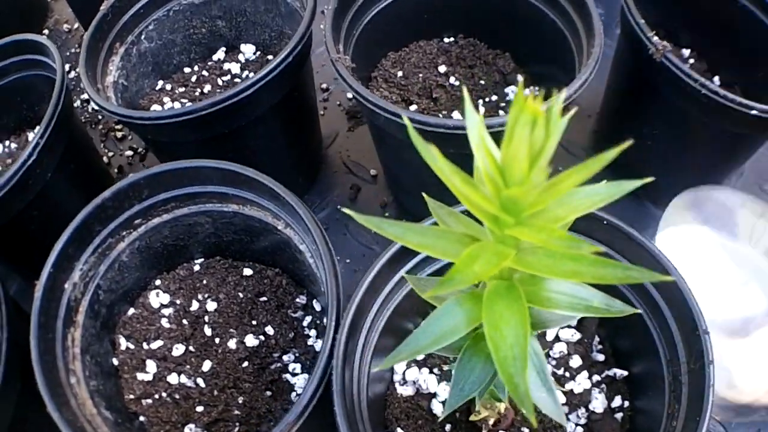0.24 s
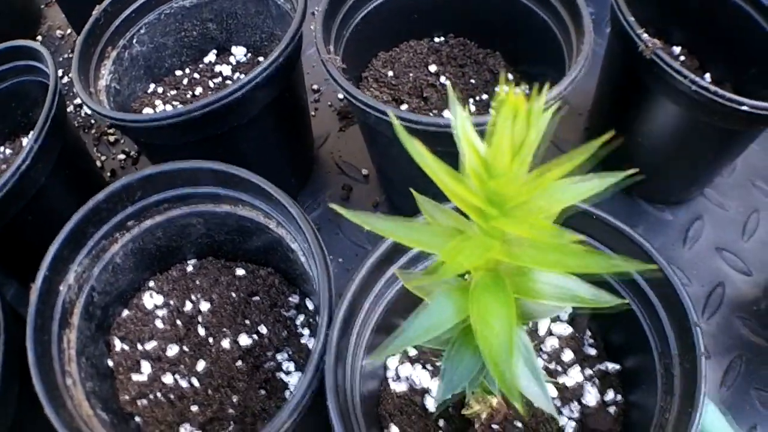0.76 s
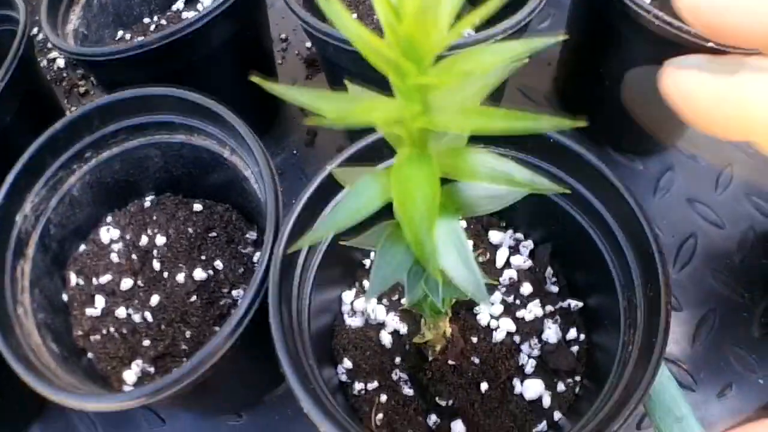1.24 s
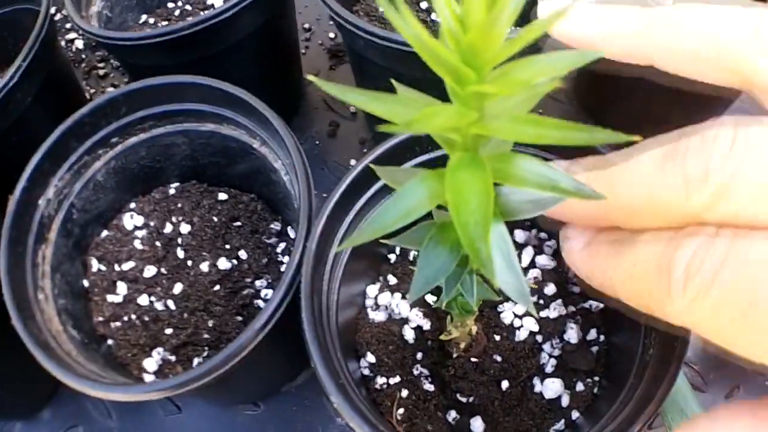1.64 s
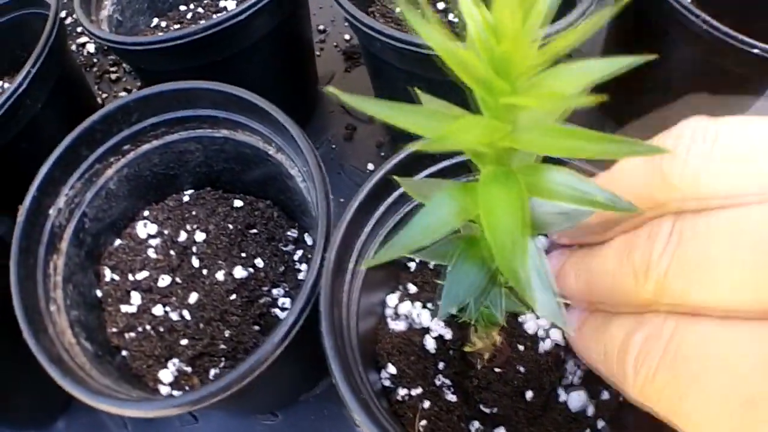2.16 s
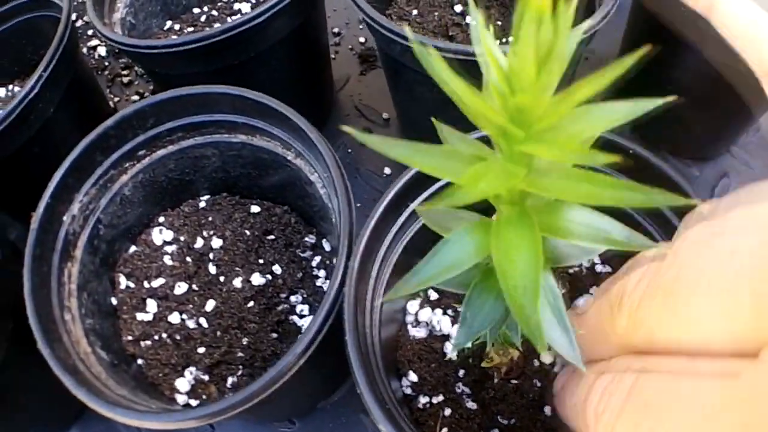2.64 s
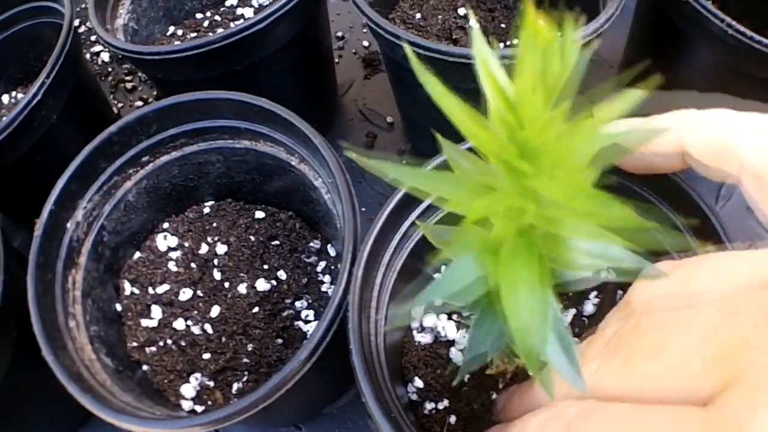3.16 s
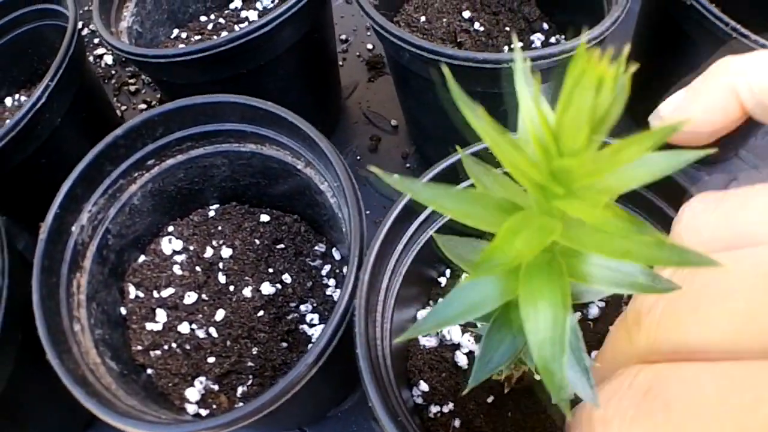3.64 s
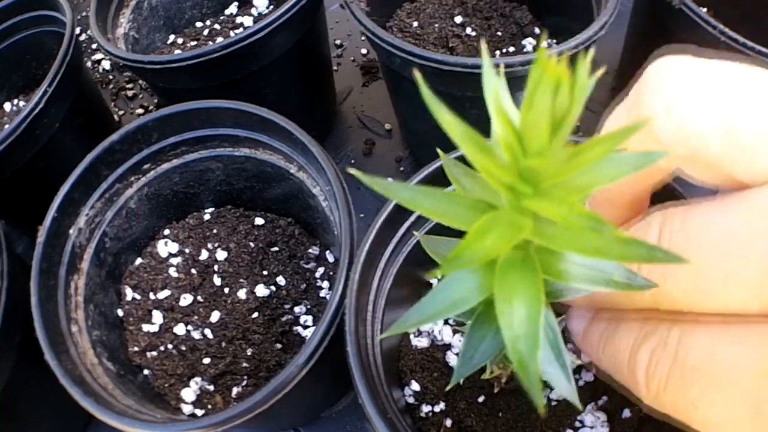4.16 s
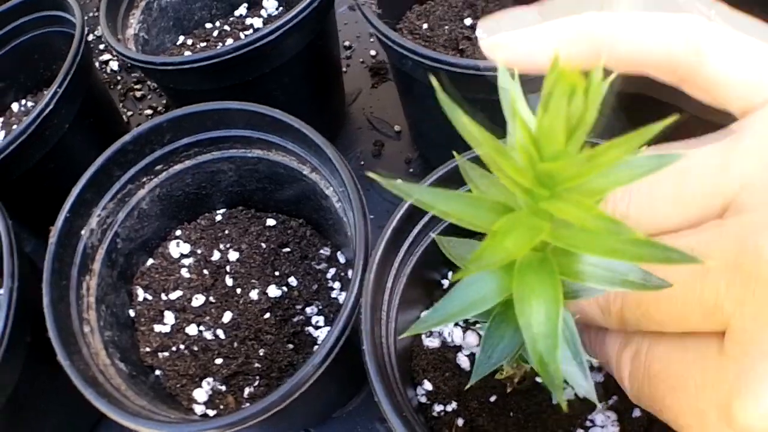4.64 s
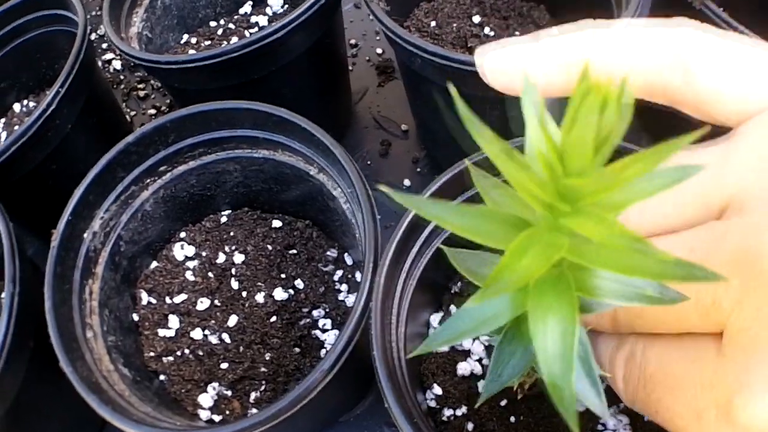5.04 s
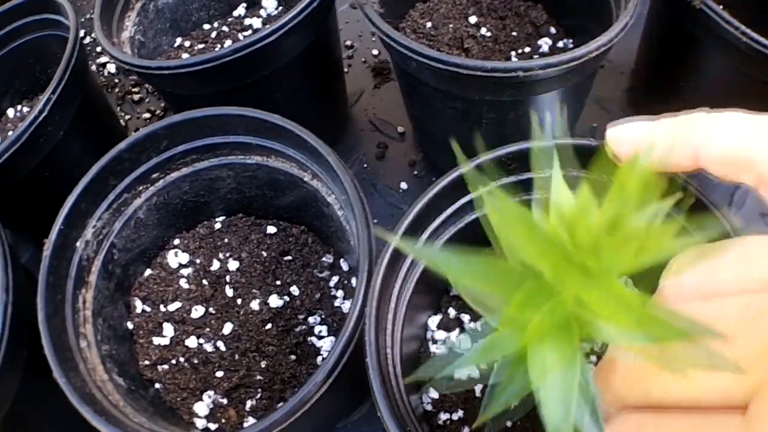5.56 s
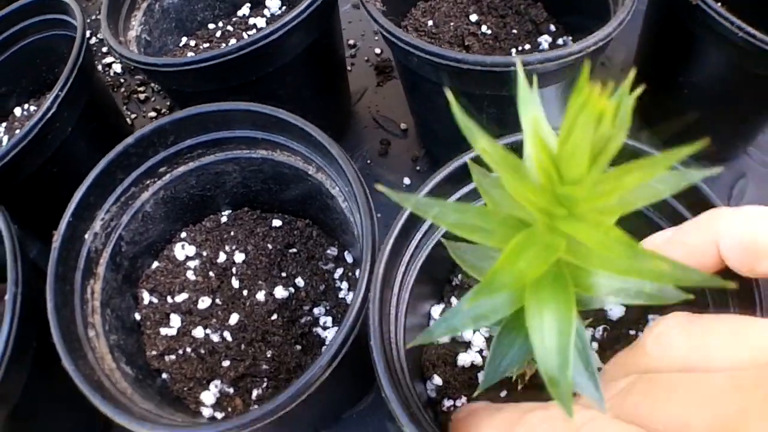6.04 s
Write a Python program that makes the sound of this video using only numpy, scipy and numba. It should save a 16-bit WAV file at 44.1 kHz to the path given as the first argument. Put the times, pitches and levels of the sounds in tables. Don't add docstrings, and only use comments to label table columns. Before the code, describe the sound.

Close up outdoors, a scoop raps a thin plastic pot hard, coarse grit rattles inside it, and a second sharp knock follows with a brief spill of fine soil. Wind thumps the small camera microphone around the knocks. After a short quiet gap, fingers press and drag the gritty compost in small, dry, scratchy strokes with tiny clicks, over faint outdoor wash and hiss.

```python
import sys
import numpy as np
from scipy import signal
from scipy.fft import rfft, irfft, next_fast_len
from scipy.io import wavfile
from scipy.ndimage import uniform_filter1d
from numba import njit

SR = 44100
rng = np.random.default_rng(int(sys.argv[2]) if len(sys.argv) > 2 else 0)


def dump(signal):
    limited = np.clip(np.atleast_2d(signal).T, -1, 1)
    pcm = np.round(limited * 32767).astype(np.int16)
    wavfile.write(sys.argv[1], SR, pcm)


def to_linear_factor(level_db):
    exponent = np.asarray(level_db, float) / 20
    return 10 ** exponent


N = 277996
TIME = np.arange(N) / SR
FULL_PRESSURE_DB = -37


@njit
def ring(at, hz, t60, size, push):
    out = np.zeros(N)
    for k in range(len(at)):
        turn = np.exp(2j * np.pi * hz[k] / SR - np.log(1000) / (t60[k] * SR))
        ease, left, z = np.exp(-hz[k] / (push * SR)), 1., size[k] + 0j
        for i in range(at[k], min(N, at[k] + int(t60[k] * SR))):
            out[i] += z.imag * (1 - left)
            z *= turn
            left *= ease
    return out


def samples(s):
    return (s * SR).astype(np.int64)


def unit(x):
    return x / np.sqrt(np.mean(x ** 2))


def shaped(points):
    hz, db = np.transpose(points)
    n = next_fast_len(N)
    f = np.maximum(np.fft.rfftfreq(n, 1 / SR), 1)
    colour = to_linear_factor(np.interp(np.log(f), np.log(hz), db, -90, -90))
    return unit(irfft(rfft(rng.standard_normal(n)) * colour, n)[:N])


def walk(rate):
    k = int(SR / rate)
    held = np.repeat(rng.standard_normal(N // k + 1), k)
    return 0.81 * uniform_filter1d(held, k)[:N]


def drawn(points):
    return np.interp(TIME, *np.transpose(points))


def above(x, hz):
    return signal.sosfilt(signal.butter(8, hz, "high", fs=SR, output="sos"), x)


def hollow(x, bands):
    for hz, width, depth in bands:
        x = x - np.clip(depth, 0, 1) * signal.lfilter(*signal.iirpeak(hz, hz / width, fs=SR), x)
    return x


def strokes(*kinds):
    t = np.arange(0, N / SR + .002, .001)
    power, columns = [], []
    for rows, rise_s, tilt_db, fall_s in kinds:
        s, length, db, *rest = np.transpose(rows)[:, :, None]
        done = np.clip((t - s) / length, 0, 1)
        edges = np.maximum(s - t, 0) / rise_s + np.maximum(t - s - length, 0) / fall_s
        level_db = db + tilt_db * done - max(tilt_db, 0) - 20 * edges
        power.append(to_linear_factor(np.maximum(level_db, -200)) ** 2)
        columns.append(rest)
    power = np.concatenate(power)
    total = power.sum(0)
    blended = (np.concatenate(columns, axis=1) * power).sum(1) / total
    return [np.interp(TIME, t, c) for c in (10 * np.log10(total), *blended)]


# frequency [Hz], level [dB per Hz].
AIR_COLOUR = [(15, -47), (25, -2), (45, -7.5), (85, -12), (204, -10.5), (284, -10), (465, -8), (859, -9.5),
              (2150, -14.5), (2600, -13.5), (7000, -22.5), (9100, -50), (15400, -120)]
# pitch [Hz], level [dB].
DRONE = (62.4, -61)


def air():
    hz, db = DRONE
    drone = to_linear_factor(db) * shaped([(hz * 0.71, -18), (hz, 0), (hz * 1.25, -18)])
    wash = shaped(AIR_COLOUR + [(9000, -30)])
    return to_linear_factor(-47.5 + 0.16 * walk(2.63)) * wash + drone


# start [s], length [s], rumble [dB], flutter over rumble [dB].
GUSTS = [(0.001, 0.004, -27, -26), (.02, 0.12, -36.5, -8), (.17, 0.15, -37.5, -21), (.27, 0.051, -32, -19),
         (.34, 0.19, -41, -13), (.51, 0.054, -31.5, -6), (.555, 0.093, -28, 8.5), (.66, 0.11, -35, 4),
         (.86, 0.14, -43.5, -7.5), (.985, 0.044, -37, 10), (1.04, 0.068, -46.5, -8),
         (1.22, 0.037, -44.5, -18), (1.3, 0.19, -55, -10), (1.665, 0.028, -38.5, -29),
         (1.72, 0.15, -48, -20), (1.85, 0.078, -43.5, -18), (1.955, 0.081, -35.5, -3.5),
         (2.1, 0.12, -54, -18), (2.44, 0.14, -58, -19), (2.78, 0.14, -51, -23), (3.0, .1, -63, -10)]
# [Hz, negative sucks first].
PUFFS = [(.206, -25, 195), (0.266, -27, 94), (0.289, -14.5, 111), (.306, -16, 360), (0.346, -29, 216),
         (0.421, -26.5, 229), (0.541, -17, 300), (0.5597, -5, 131), (0.5798, -7, 172), (.591, -10, -150),
         (0.617, -21, 152), (0.62, -10, 398), (1.002, -23, 172), (1.665, -31, 49), (1.73, -43, 71),
         (1.798, -34, 73), (1.943, -25, 102), (1.9585, -18.5, 186), (1.968, -23, -27), (1.977, -32, 129),
         (1.987, -30, 132), (2.007, -29, 130), (2.043, -30.5, 134)]
# time [s], level [dB].
SWAY = [(0, -44), (.25, -45), (.45, -49), (.6, -41), (.85, -56), (1.0, -74), (1.4, -69), (1.65, -50),
        (1.85, -47.5), (1.98, -44), (2.15, -44), (2.3, -58), (2.55, -54.5), (2.85, -51), (3.0, -65),
        (3.3, -76)]


def wind():
    db, flutter_db = strokes((GUSTS, 0.03, -5, 0.083))
    deep = shaped([(12, -5), (30, -6.0), (55, -3.0), (90, -19)]) * to_linear_factor(4.2 * walk(24.8))
    rumble = shaped([(40, -7), (90, -0.5), (150, -4.5), (300, -17.5)]) * to_linear_factor(3.8 * walk(30.5))
    flutter = shaped([(100, 4.5), (170, -6.5), (400, 0.5), (700, -14), (1200, -14)]) * to_linear_factor(7.2 * walk(90))
    buffet = to_linear_factor(db - 7.5) * deep + to_linear_factor(1.265 * db + 4.5) * rumble + to_linear_factor(db + flutter_db - 11.5) * flutter

    s, puff_db, hz = np.transpose(PUFFS)
    puffs = ring(samples(s), np.abs(hz), 6 / np.abs(hz), np.sign(hz) * to_linear_factor(puff_db + 2.5), 0.91)
    sway = shaped([(7, -9), (14, 5), (26, -3.5), (40, -39)]) * to_linear_factor(drawn(SWAY))
    earlier_gust = -to_linear_factor(-27.0) * np.exp(-(TIME / 0.005) ** 2)
    return buffet + puffs + earlier_gust + sway


def grit(curves, count, scatter_db, spread, cycles, edge_hz, dull_db, dull_hz,
         upper_db, upper_hz, bright_hz, bright_db, clump_db):
    db, hz, tick_db, thud_db = curves
    at = rng.integers(0, N, (4, count))
    size = to_linear_factor(scatter_db * np.minimum(rng.exponential(size=(4, count)), 4))
    pitch = np.exp(np.clip(rng.standard_normal((4, count)), -1.6, 1.6))
    narrowing = np.clip(2.0 - 0.1 * (db[at[0]] - FULL_PRESSURE_DB), .35, 1)
    f = np.clip([hz[at[0]] * pitch[0] ** (spread * narrowing),
                 upper_hz * pitch[1] ** .1,
                 bright_hz * pitch[2] ** .075,
                 dull_hz * pitch[3] ** .22], 300, 7800)
    wall, upper, tick, thud = (unit(ring(at[k], f[k], cycles * stretch / f[k], size[k], 0.35))
                               for k, stretch in enumerate((1, 1.6, 2.4, 1)))
    mix = unit(above(above(wall, edge_hz), edge_hz))
    mix = mix + to_linear_factor(upper_db) * upper + to_linear_factor(bright_db + tick_db) * tick + to_linear_factor(thud_db + dull_db) * thud
    return to_linear_factor(db + clump_db * walk(120)) * mix


def settle():
    since = TIME - .989
    db = np.where(since > 0, -28 - 188 * since, -200)
    hz = 2400 - 2500 * np.clip(since, 0, .15)
    return grit((db, hz, -21, -5), count=40000, scatter_db=2.0, spread=0.25, cycles=25, edge_hz=1380,
                dull_db=-3.0, dull_hz=830, upper_db=-11, upper_hz=3320, bright_hz=5040, bright_db=-14,
                clump_db=2.0)


# start [s], length [s], level [dB], ring [Hz], dull thud [dB].
SLIDES = [(.54, 0.056, -34, 2170, -4), (.606, 0.048, -37, 2500, -6), (.648, 0.063, -32.5, 2600, -14),
          (.7225, 0.012, -33.5, 2400, -8), (.745, 0.026, -39, 2400, -11), (.7735, 0.013, -31.5, 2940, -22),
          (.794, 0.032, -31.5, 2500, -18), (.835, 0.0069, -40, 2500, -20), (.86, 0.079, -53, 2500, -16),
          (.922, 0.023, -39.5, 2500, -5), (.943, 0.026, -34, 2530, -8)]


def rattle():
    db, hz, thud_db = strokes((SLIDES, .006, -4, 0.025))
    return grit((db, hz, -7.5, thud_db), count=6000, scatter_db=2.5, spread=0.27, cycles=10.0, edge_hz=1570,
                dull_db=-2.5, dull_hz=790, upper_db=-11.5, upper_hz=3700, bright_hz=4870, bright_db=-5.0,
                clump_db=4.0)


# start [s], length [s], peak [dB], ring [Hz], bright tick [dB].
PUSHES = [(1.512, 0.034, -43.5, 3170, 0.5), (1.585, 0.022, -42.5, 3000, 0.5), (1.97, 0.04, -47, 3000, 0.5),
          (2.09, 0.047, -51, 2750, -9), (2.19, 0.063, -48, 2980, -17), (2.4, 0.049, -39, 2980, -12),
          (2.57, 0.042, -44.5, 2660, -10), (2.747, 0.019, -34, 2840, -9), (2.895, 0.019, -46.5, 2770, -10),
          (3.005, 0.052, -41.5, 2820, -8), (3.435, 0.037, -38.5, 2440, -6), (3.79, 0.033, -47, 3530, -5),
          (4.04, 0.032, -41, 2800, -24), (4.485, 0.13, -39, 2800, -10), (4.63, 0.08, -35, 2900, -10),
          (4.802, 0.021, -37, 2660, -16), (4.875, 0.071, -37, 2750, -9), (5.012, 0.037, -36.5, 2740, -12),
          (5.092, 0.031, -35, 2770, -9.5), (5.34, 0.042, -50, 2700, -12), (5.74, 0.052, -41.5, 2760, -7),
          (5.89, 0.043, -46.5, 2600, -6), (6.085, 0.078, -42.5, 2860, -4), (6.15, 0.043, -40.5, 2870, -14)]
# start [s], length [s], peak [dB], ring [Hz], bright tick [dB].
DRAGS = [(1.43, 0.076, -50, 2930, 0), (2.26, 0.14, -51, 2900, -9), (2.45, 0.047, -43, 2750, -11),
         (2.625, 0.045, -49.5, 2800, -4), (2.775, 0.02, -45, 2870, -14), (2.84, 0.038, -49, 2740, -9),
         (3.25, 0.052, -44.5, 2950, -5), (3.396, 0.047, -47.5, 2420, -11), (3.515, 0.04, -45.5, 2270, -15),
         (3.85, 0.094, -52, 3150, -21), (4.005, 0.024, -45, 2800, -5.5), (4.116, 0.0083, -39.5, 2720, -13),
         (4.332, 0.097, -41.5, 3120, -9.5), (4.735, 0.0065, -41.5, 2930, 0),
         (4.835, 0.022, -42.5, 2630, -14), (5.188, 0.056, -38.5, 2800, -8.5),
         (5.557, 0.047, -40.5, 2800, -3.5), (5.805, 0.021, -43.5, 2920, -10), (5.935, 0.027, -46, 2600, -6),
         (6.015, 0.12, -48.5, 2940, -12), (6.225, 0.035, -41.5, 2900, -10), (6.275, .04, -43, 2920, -7)]
# time [s], level [dB].
UPPER_RING = [(1.4, -6), (2.0, -2.5), (2.5, -10.5), (3.3, -10), (3.55, -10), (3.8, -10), (4.1, -18),
              (4.35, -14), (4.52, -2), (4.62, -12), (4.73, -4.5), (5.1, -7.5), (5.57, -3.5), (5.7, -8.5),
              (6.3, -10)]


def fingers():
    db, hz, tick_db = strokes((PUSHES, 0.024, 8.5, 0.034), (DRAGS, 0.017, -1.5, 0.027))
    packing = np.clip((db - FULL_PRESSURE_DB) / 10, -1, 1) / 2
    hz = hz * (1 + 0.054 * packing)
    thud_db = -16 + 11 * np.exp(-((TIME - 4.07) / 0.11) ** 2)
    return grit((db, hz, tick_db, thud_db), count=24000, scatter_db=2.0, spread=0.16, cycles=13.0, edge_hz=1840,
                dull_db=1.5, dull_hz=1184, upper_db=drawn(UPPER_RING), upper_hz=4230, bright_hz=5960,
                bright_db=-2.0, clump_db=0.86)


# time [s], peak [dB], ring [Hz].
SCOOP_STONES = [(0.5489, -25, 1880), (0.5521, -28, 2600), (0.5563, -31, 1780), (0.5812, -29, 2090),
                (0.5955, -16, 2250), (0.6005, -22, 2390), (0.6084, -20, 2120), (0.612, -20, 2800),
                (0.6164, -19, 2850), (0.6214, -22, 2060), (0.628, -20, 2720), (0.63, -22, 1710),
                (0.6382, -15, 2990), (0.6395, -13.5, 2930), (0.644, -18.5, 1990), (0.6495, -27, 3110),
                (0.652, -24, 2950), (0.658, -29, 1680), (0.6609, -27, 2800), (0.6635, -22, 1940),
                (0.6677, -23, 2790), (0.674, -21.5, 1780), (0.68, -23, 2130), (0.6834, -26, 1900),
                (0.6898, -21, 3550), (0.6927, -26, 2440), (0.699, -21, 2780), (0.7212, -22, 2370),
                (0.7282, -22.5, 2600), (0.733, -23, 2330), (0.7478, -31, 3070), (0.759, -28, 2380),
                (0.772, -21, 2500), (0.7785, -20.5, 3800), (0.7927, -17.5, 3060), (0.797, -26, 3010),
                (0.8023, -20, 2060), (0.8066, -34, 3140), (0.8117, -21, 2490), (0.8205, -16, 2260),
                (0.8245, -27, 2600), (0.8354, -32, 2940), (0.8378, -30, 2040), (0.8418, -30, 3100),
                (0.8736, -37, 2780), (0.8923, -38, 2620), (0.914, -34, 3380), (0.9264, -32, 3050),
                (0.938, -34, 2750), (0.9439, -23, 2880), (0.9468, -23, 3050), (0.9516, -34, 3050),
                (0.9618, -29, 2500), (1.0209, -28, 1850), (1.0286, -31, 1850), (1.0401, -31, 2170),
                (1.0447, -31, 1860), (1.0495, -32, 1970), (1.0585, -30, 2250), (1.0787, -31, 1970),
                (1.1241, -35, 1940)]
# time [s], peak [dB], ring
# [Hz], bright tick [dB].
SOIL_STONES = [(1.428, -38, 3120, -12), (1.5299, -33, 3090, -5), (1.538, -35, 3370, -3),
               (1.5404, -35, 3010, 1), (1.5944, -36, 3000, -2), (2.3353, -32.5, 3660, -4),
               (2.4175, -33, 3010, -8), (2.42, -37, 2610, -13), (2.4317, -35, 2770, -11),
               (2.4367, -26, 3140, -20), (2.4466, -32, 4080, -9), (2.4513, -36, 2650, -11),
               (2.4629, -34, 3080, -8), (2.4758, -32, 2710, -15), (2.484, -35, 2370, -12),
               (2.747, -29.5, 3660, 5), (2.7503, -37, 2410, -3), (2.7572, -34, 2900, -10),
               (2.759, -28, 3070, 0), (2.764, -27, 3220, -7), (2.7702, -36, 3060, -12),
               (2.781, -30, 2700, 1.5), (2.7876, -36, 3060, -11), (2.9123, -35, 2670, -10),
               (2.9204, -34, 2750, -15), (3.032, -31, 3100, -11), (3.0441, -31, 2650, -13),
               (3.242, -34, 2960, -14), (3.2564, -29, 3200, -2), (3.2636, -33, 2010, -14),
               (3.2683, -37, 2240, -10), (3.28, -28, 3350, -17), (3.2861, -31, 3320, -17),
               (3.2911, -31, 2200, -17), (3.3936, -29.5, 2280, -14), (3.404, -29, 2510, -11),
               (3.416, -32, 2460, -19), (3.4409, -34, 2170, -12), (3.4772, -38, 2850, -12),
               (3.4849, -40, 2210, -17), (4.054, -36, 2790, -12), (4.117, -32.5, 2660, -16),
               (4.3338, -24.5, 3300, -11), (4.34, -32, 2920, -18), (4.371, -34, 3150, -17),
               (4.3789, -29, 3170, -5), (4.4014, -28.5, 2720, -6), (4.4096, -28, 2920, -14),
               (4.6993, -27, 2820, -5), (4.7104, -26, 2930, -7), (4.7137, -29, 3380, -5),
               (4.722, -29, 2850, -3), (4.7258, -29.5, 2560, 0), (4.7344, -28.5, 3100, -5),
               (4.8143, -32, 2360, -17), (4.8259, -31, 2590, -17), (4.8354, -36, 2200, -10),
               (4.8381, -32, 2730, -15), (4.8656, -31, 2550, -18), (4.899, -34, 2220, -16),
               (4.9088, -30, 3060, -14), (4.917, -26, 3180, -14), (4.941, -23, 3000, -2),
               (4.9474, -19.5, 3020, -21), (4.9511, -31, 3750, -11), (4.9544, -34, 2940, -10),
               (5.0337, -30, 2440, -12), (5.0368, -33, 2700, -11), (5.0486, -27, 2680, -16),
               (5.0543, -34, 3230, -14), (5.0822, -32, 2600, -8), (5.0908, -31, 2930, -14),
               (5.11, -31, 2300, -12), (5.1128, -28, 2740, -17), (5.1155, -21, 2960, -16),
               (5.1203, -31, 2420, -11), (5.1806, -26, 2800, -15), (5.189, -31, 3430, -11),
               (5.1936, -26, 2650, -15), (5.21, -31, 2800, -9), (5.215, -26, 3040, -16),
               (5.2259, -32, 3110, -17), (5.232, -39, 2350, -15), (5.5613, -28.5, 2240, -0.5),
               (5.5824, -31, 2420, -20), (5.5947, -28, 2730, -5), (5.604, -30, 2580, -15),
               (6.1737, -31, 2680, -7), (6.1995, -36, 2330, -19), (6.2317, -30, 2570, -19),
               (6.2359, -33, 3170, -18), (6.2937, -27, 3080, -16)]
# mode [Hz], level [dB], t60 [s].
SCOOP_WALL = [(1740, -8, 0.014), (2350, -17, 0.0055), (3000, -2, 0.0099), (4080, -19, 0.0055)]


def stones():
    in_scoop = [(*row, -28) for row in SCOOP_STONES]
    s, db, hz, bright_db = np.transpose(in_scoop + SOIL_STONES)
    at = samples(s + 0.0003)
    off = rng.standard_normal((len(s), 6)).T
    body = ring(at, hz, 26 / hz, to_linear_factor(db + 2.0), 0.3)
    body += ring(at + 9, hz * (1.58 + 0.17 * off[0]), 15 / hz, to_linear_factor(db - 12.5), 0.97)
    body += ring(at + 5, hz * (0.93 + 0.036 * off[1]), 22 / hz, to_linear_factor(db - 1.5), .6)
    body += ring(at + 3, 4300 + 300 * off[3], 11 / hz, to_linear_factor(db - 15), 0.56)

    bounce_at = at + samples(0.002235 * np.exp(0.13 * off[4]))
    body += ring(bounce_at, hz * np.exp(0.09 * off[5]), 22 / hz, to_linear_factor(db - 2.5), 0.69)

    scoop = slice(len(SCOOP_STONES))
    for k, (wall_hz, wall_db, t60) in enumerate(SCOOP_WALL):
        level = to_linear_factor(db[scoop] + wall_db + 2.5 * off[k + 2, scoop])
        body += ring(at[scoop], wall_hz * np.exp(0.082 * off[k, scoop]), t60 + 0 * s[scoop], level, 1.0)

    ticks = 0
    for k, tick_hz, tick_db in ((2, 6100, 4.2), (3, 4890, 4.5)):
        ticks = ticks + ring(at, tick_hz + 250 * off[k], 17 / hz, to_linear_factor(db + bright_db + tick_db), 0.9)
    return above(body, 1510) + ticks


# time [s], peak [dB].
KNOCKS = [
    [(.5244, 8), (.5299, -16), (.5422, 0), (.9999, -0.5)],
    [(.9863, 6), (1.0092, -2.5), (1.0113, -19)],
    [(2.662, -8.5)],
]
# mode [Hz], level [dB], t60 [s].
SCOOP = [(417, -0.5, 0.014), (870, -3, 0.0067), (1103, -12, 0.014), (1680, 1, 0.011), (1960, 3, 0.0075),
         (2250, 3, 0.0054), (2500, -7.5, 0.01), (2800, -7, 0.016), (3120, -28, 0.014), (4100, -24, 0.021),
         (6700, -5.5, 0.0025), (10400, -27, 0.003), (11600, -26, 0.0049), (14100, -36, .003)]
# mode [Hz], level [dB], t60 [s].
POT = [(399, -1.5, 0.018), (860, -8, 0.021), (963, -8.5, 0.027), (1270, -2, 0.021), (1406, -8.5, 0.041),
       (1900, -30, 0.47), (1970, -14, 0.014), (2380, -2, 0.014), (2780, 2.5, 0.011), (2980, -0.5, 0.012),
       (3490, 3, 0.0086), (4430, -10.5, 0.014), (4870, -20, 0.0076), (6050, -14, 0.0052),
       (13300, -18, .004), (14900, -18, .005)]
# mode [Hz], level [dB], t60 [s].
RIM = [(1100, -14, .004), (2330, -11, 0.011), (2600, -1, 0.0063), (3490, 6, 0.0043), (3920, -9, 0.0027),
       (5130, 5.5, 0.003), (6550, -1, 0.0028), (9800, -14, .003), (13200, -11, 0.0027), (15300, -10, .003)]
# centre [Hz], width [Hz], depth [0-1].
KNOCK_GAPS = [
    [(1300, 520, .85), (3620, 670, 0.94)],
    [(1600, 200, 0.7), (3280, 200, 0.3)],
    [(4300, 400, .3)],
]


def knocks():
    out = 0
    for blows, body, gaps in zip(KNOCKS, (SCOOP, POT, RIM), KNOCK_GAPS):
        hz, mode_db, t60 = np.transpose(body)
        s, db = np.transpose(blows)[:, :, None]
        size = to_linear_factor(db + mode_db - 8.0 + (db - db[0]) * hz / 3500).ravel()
        at = samples(s + 0 * hz).ravel()
        hz, t60 = (hz + 0 * s).ravel(), (t60 + 0 * s).ravel()
        deep = ring(at, hz, t60, size * (hz < 1500), .6)
        thin = ring(at, hz, t60, size * (hz >= 1500), .4)
        out = out + hollow(deep + above(thin, 1480), gaps)
    return out


# centre [Hz], width [Hz], depth [0-1].
HOLLOWS = [
    (3670, 280, 0.13),
    (5200, 1200, 0.18),
]


def scene():
    in_pot = settle() + rattle() + fingers() + stones()
    return (air() + wind() + hollow(in_pot, HOLLOWS) + knocks())[None]


# frequency [Hz], level [dB per Hz].
HISS_COLOUR = [(8000, -70), (8060, -15.5), (8600, -7.5), (9000, -3.5), (11700, -1), (11850, -52),
               (12000, -1.5), (15300, -2), (15340, -70)]


def camera_hiss(heard):
    loud = signal.lfilter([.002], [1, -.998], np.abs(heard))
    return to_linear_factor(-56) * shaped(HISS_COLOUR) / (1 + 9 * loud)


def starve(x, margin_db, chance_db):
    hz, _, z = signal.stft(x, SR, nperseg=2048)
    power = uniform_filter1d(np.abs(z) ** 2, size=13, axis=0) + 1e-20
    mid = power[(hz > 1500) & (hz < 4500)].mean(0)
    steady_mid = np.minimum(mid, np.roll(mid, 2))
    under_db = 10 * np.log10(steady_mid / power)
    luck = rng.standard_normal((len(hz) // 16 + 1, z.shape[1]))
    luck = np.repeat(luck, 16, axis=0)[:len(hz)]
    lost = (hz[:, None] > 6800) & (under_db > margin_db + chance_db * luck)
    return x - signal.istft(z * lost, SR, nperseg=2048)[1][:N]


def low_pass(x):
    return signal.sosfilt(signal.butter(12, 16510, fs=SR, output="sos"), x)


def record(dry):
    low = signal.sosfilt(signal.butter(8, 7330, fs=SR, output="sos"), dry[0])
    low = signal.sosfilt(signal.ellip(10, .3, 65, 7600, fs=SR, output="sos"), low)
    top = to_linear_factor(3.5) * above(above(dry[0], 9450), 9450)
    top = signal.sosfilt(signal.cheby2(8, 45, 15900, fs=SR, output="sos"), top)
    mix = starve(low + top + camera_hiss(low), margin_db=43.0, chance_db=13.0)
    return low_pass(np.clip(mix, -1, 1)[None])


dry = scene()
out = record(dry)
dump(out)
```